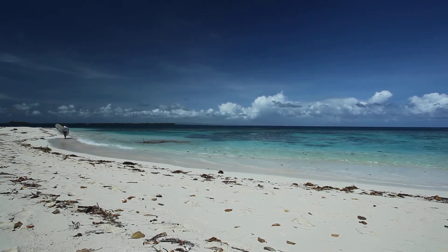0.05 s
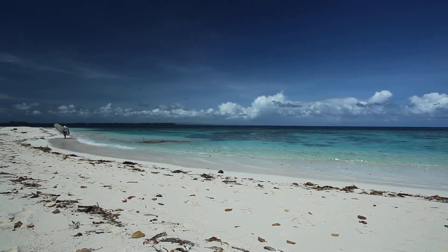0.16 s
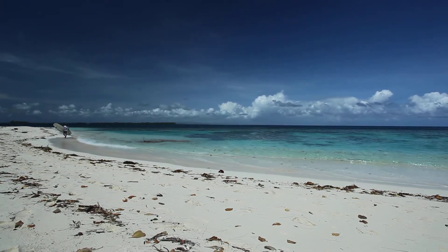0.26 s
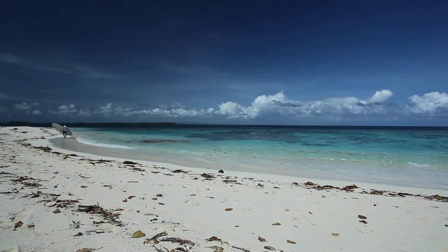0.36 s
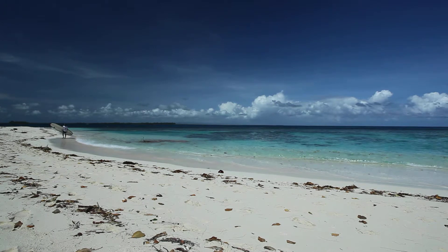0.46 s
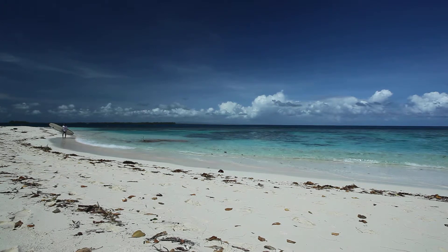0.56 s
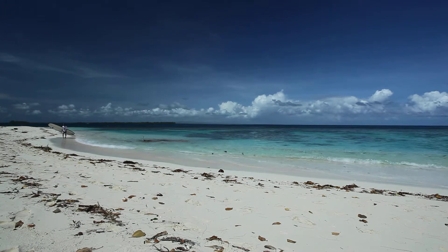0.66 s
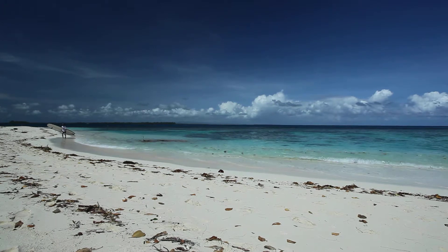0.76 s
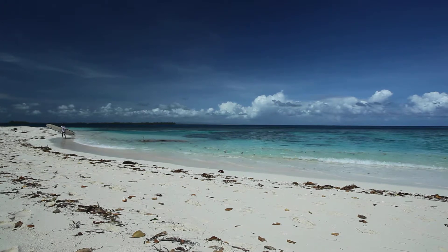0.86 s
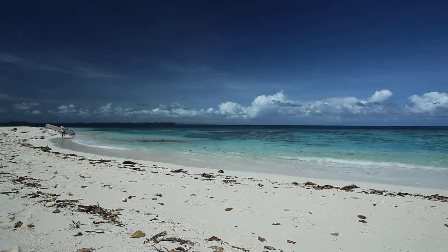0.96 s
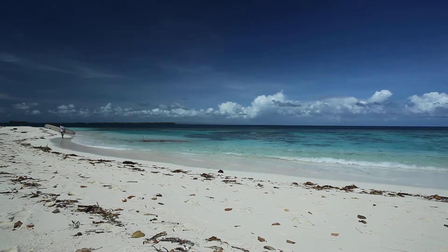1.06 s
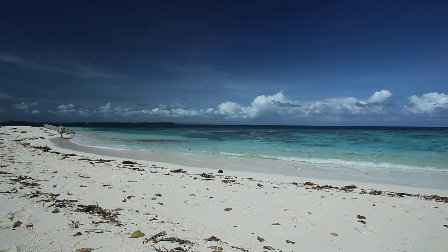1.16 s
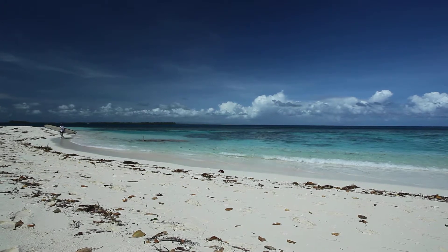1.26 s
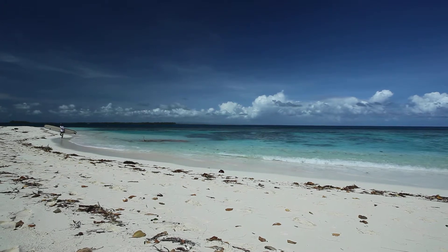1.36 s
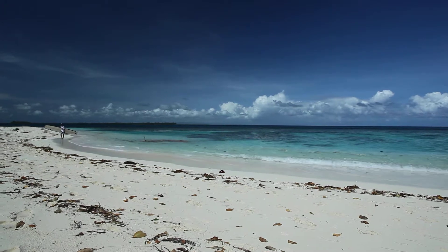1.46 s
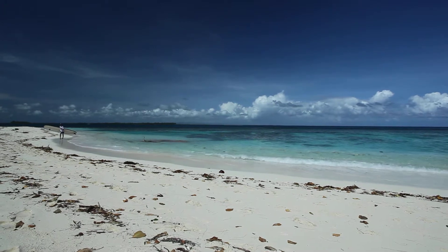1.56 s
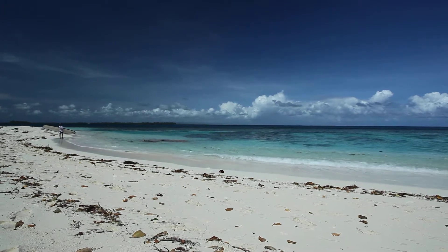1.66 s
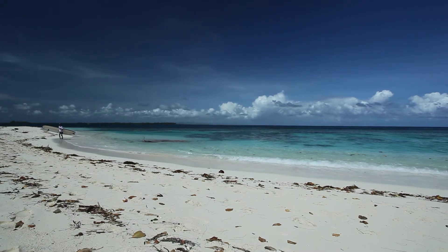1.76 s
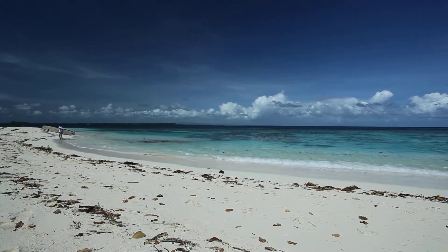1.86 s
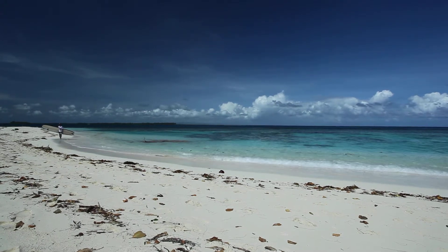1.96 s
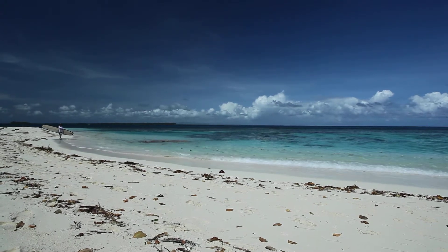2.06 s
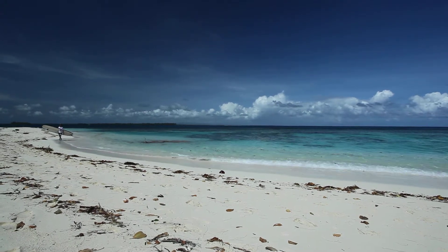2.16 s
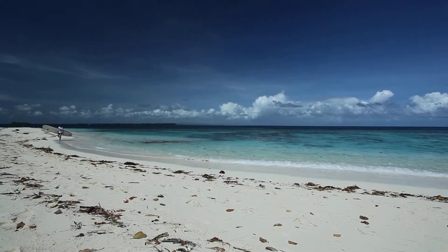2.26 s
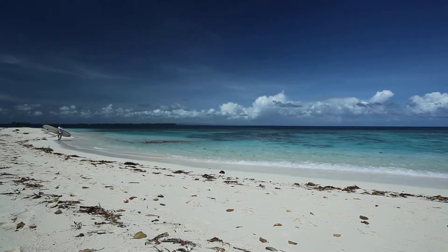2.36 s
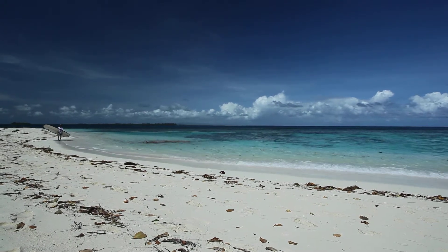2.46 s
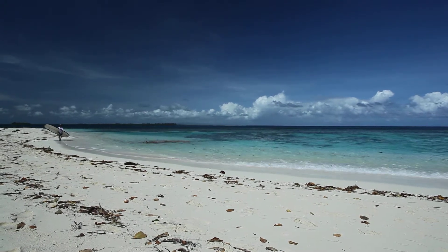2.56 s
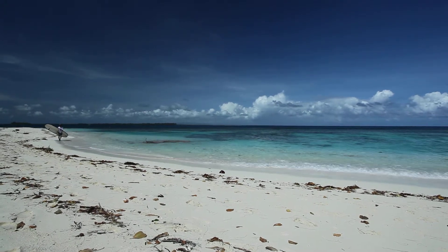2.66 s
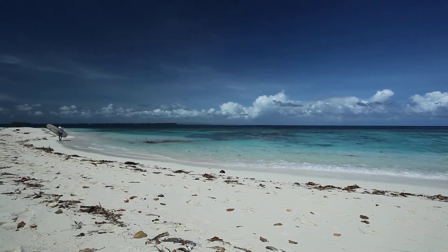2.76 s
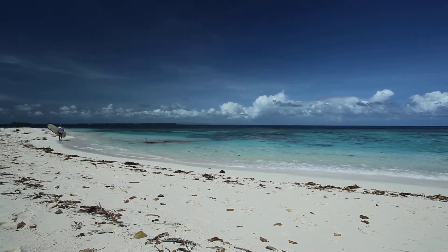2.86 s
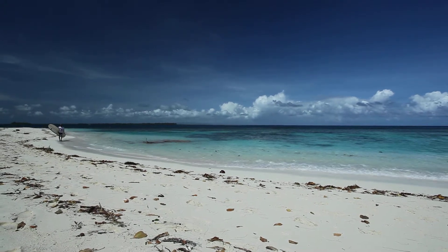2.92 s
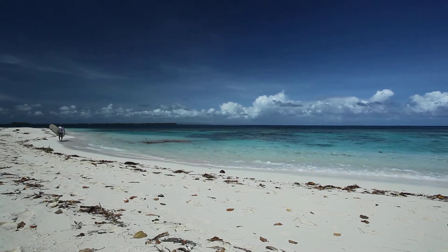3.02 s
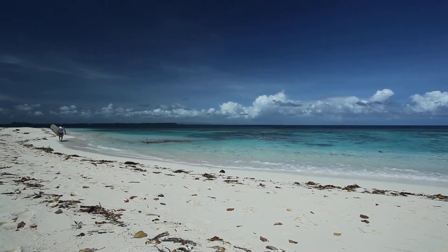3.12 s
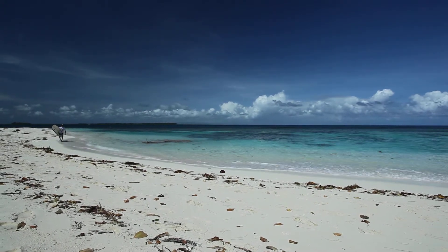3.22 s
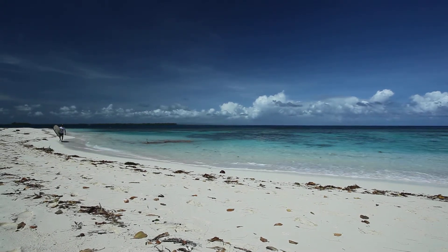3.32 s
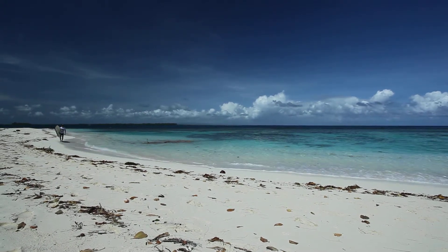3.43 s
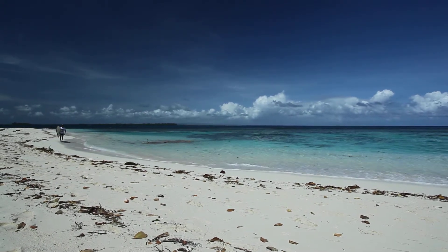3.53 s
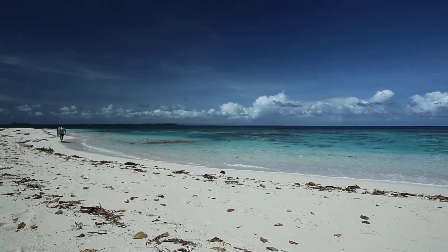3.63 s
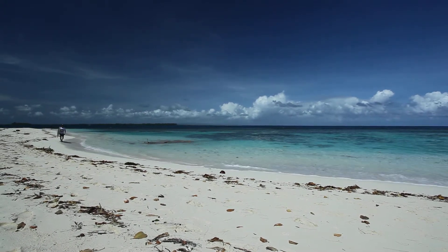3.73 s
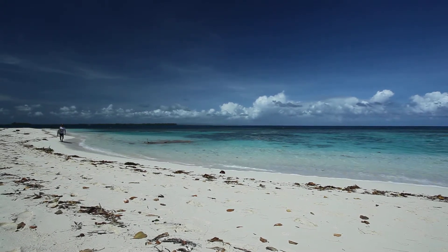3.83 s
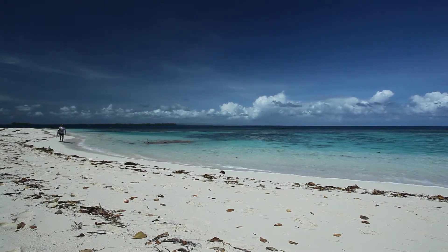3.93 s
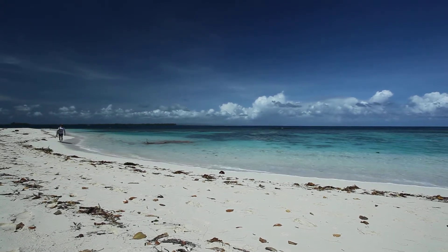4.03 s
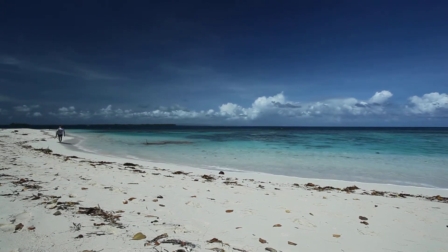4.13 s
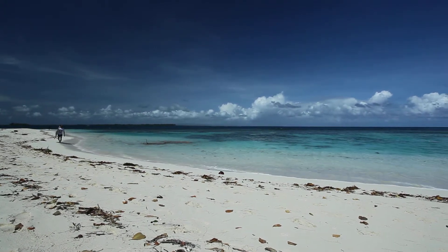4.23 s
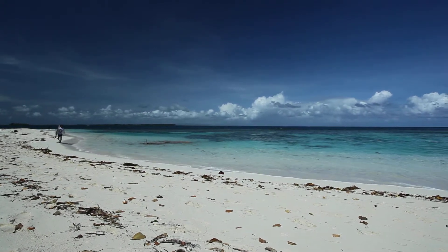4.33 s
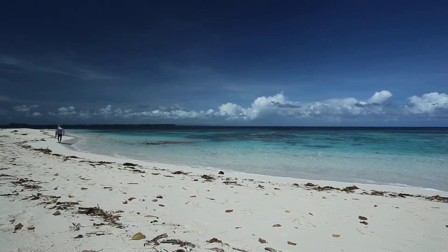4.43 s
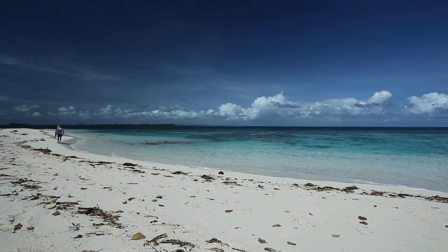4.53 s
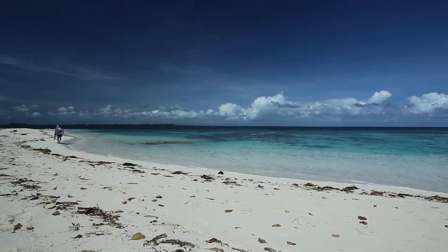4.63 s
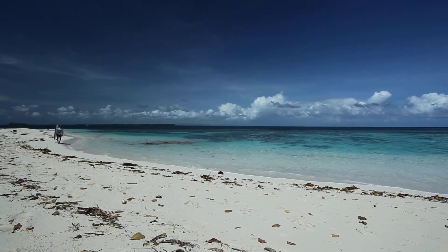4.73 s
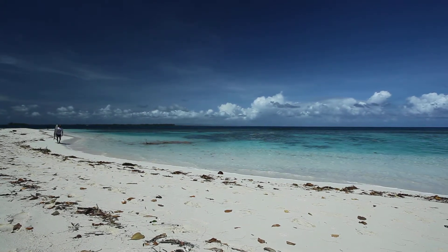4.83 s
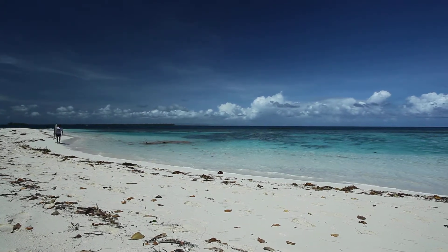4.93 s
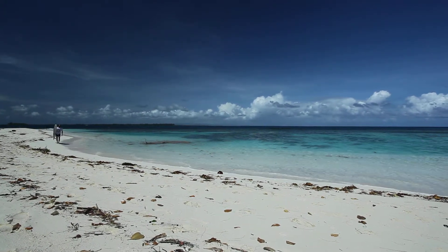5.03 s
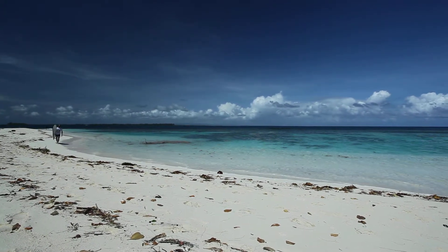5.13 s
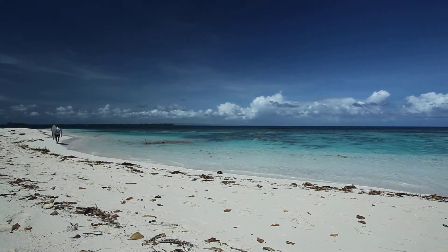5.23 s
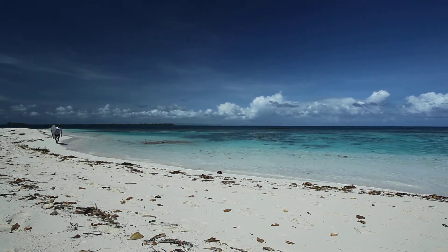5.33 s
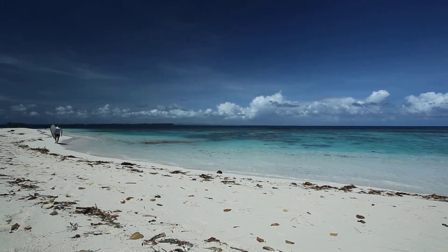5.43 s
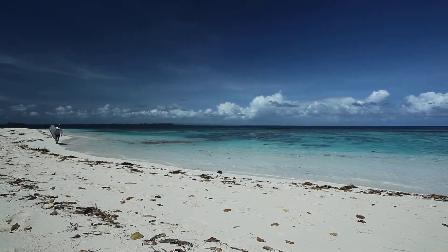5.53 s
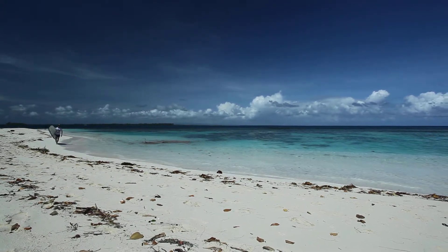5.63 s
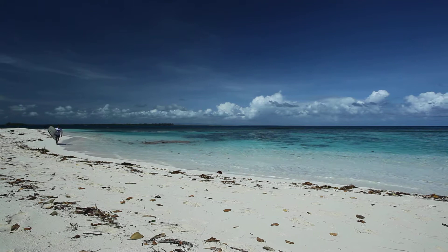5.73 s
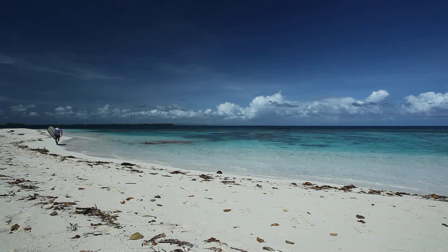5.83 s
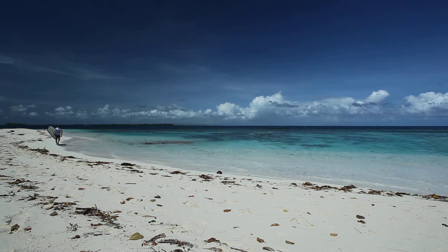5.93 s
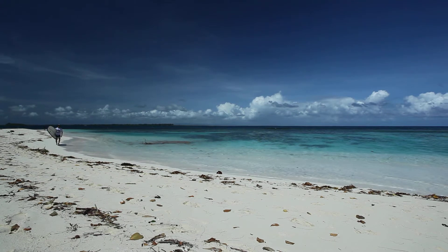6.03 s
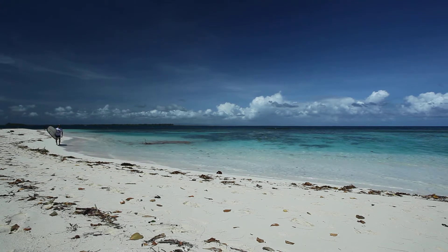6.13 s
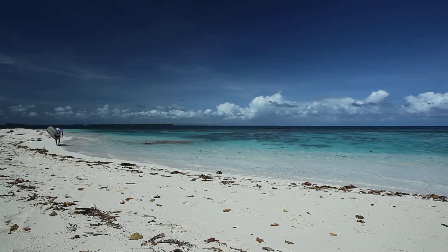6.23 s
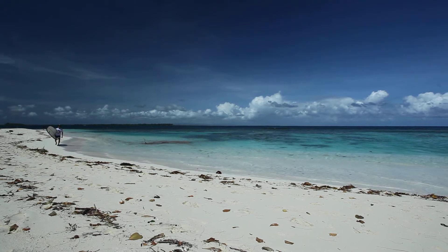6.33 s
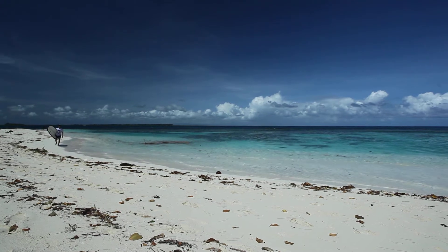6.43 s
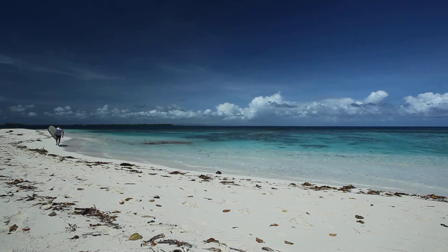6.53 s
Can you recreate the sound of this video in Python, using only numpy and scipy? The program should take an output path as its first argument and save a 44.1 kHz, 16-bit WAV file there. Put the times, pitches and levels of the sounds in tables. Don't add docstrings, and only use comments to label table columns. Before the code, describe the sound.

On an open sandy shore a small wave breaks immediately, with low bubbly gurgle and bright foamy hiss swelling to its fullest between one and two seconds. Small splashes and crisp bubble pops sit close. By three seconds it has drained to a soft fizz with faint laps. Wind rumbles and thumps the single microphone throughout; the sound is effectively mono and dry.

```python
import sys
import numpy as np
from scipy import signal
from scipy.fft import rfft, irfft
from scipy.io import wavfile
from scipy.ndimage import map_coordinates

SR = 44100
rng = np.random.default_rng(int(sys.argv[2]) if len(sys.argv) > 2 else 0)


def file_out(sig):
    cols = np.atleast_2d(sig).T
    lim = np.clip(cols, -1, 1)
    pcm = np.round(lim * 32767).astype(np.int16)
    wavfile.write(sys.argv[1], SR, pcm)


def boost(x):
    u = np.asarray(x, float) / 20
    return 10 ** u


N = 290178
HZ = np.fft.rfftfreq(N, 1 / SR) + 1e-3

# (time [s], breaker level [dB], foam level [dB])
BREAKER = [(0.0, -30.5, -34), (0.07, -29, -31), (0.42, -28.5, -31), (0.81, -25.5, -27.5),
           (1.3, -24.5, -24.5), (1.61, -24.5, -25.5), (2.05, -25, -24.5), (2.33, -28.5, -25.5),
           (2.73, -32, -33), (3.15, -37.5, -39.5), (3.43, -34, -39), (3.85, -36, -36.5), (4.16, -39.5, -39),
           (4.42, -44, -39.5), (5.07, -43, -42), (5.26, -45, -42.5), (5.68, -41, -44), (6.58, -43, -47)]
# (crest time [s], level [dB], rise [s], hold [s])
SWASH = [
    (0.244, -24.5, 0.54, 0.11),
    (1.65, -24.5, 1, 0.68),
    (2.95, -36, 0.24, .1),
    (3.595, -36.5, 0.51, 0.21),
    (5.054, -46, 0.081, 0.14),
    (5.55, -47.5, 0.17, 0.089),
]
# (crest time [s], level [dB], rise [s], hold [s])
FIZZ = [
    (1.35, -32, 0.42, 0.26),
    (2.3, -42, .3, .2),
    (4.2, -47, 0.45, .85),
]
BUBBLE_HZ = [520, 1350, 2600, 4500, 6400, 8400, 11500]
# (breaker [dB], swash [dB], foam [dB], fizz [dB], far surf [dB])
BUBBLE_MIX = [(-7.5, -31, -25, -30, -1.5), (1, -15, -25, -30, -11.5), (1, -4.5, -24, -30, -10),
              (-4, -1.5, -6, -25, -1.5), (-15, -6.5, -5, -20, -3), (-25, -21, 7, -4, -12),
              (-29, -28, -14, -5, -4.5)]
# (frequency [Hz], level per Hz [dB])
WATER_TONE = [(150, -20), (250, -5.5), (490, -3), (742, -2.5), (1160, -2.5), (1560, -1.23), (2960, -0.72),
              (4200, -3), (5410, -6), (7780, -2.5), (8900, -5), (10300, -13.5), (12500, -23), (15700, -34)]
# (time [s], extra path [mm], share of the direct sound [ratio])
SAND_ECHO = [(0.0, 48, 0.093), (0.45, 42, 0.079), (0.9, 42, 0.16), (1.2, 28, 0.073), (1.55, 22, 0.17),
             (1.9, 18, 0.054), (2.3, 25, .01), (6.58, 23, .01)]
# (time [s], peak level [dB], pitch [Hz], length [ms])
SPLASHES = [(0.111, -22.5, 2690, 22), (0.821, -21, 362, 36), (0.837, -21, 1714, 46), (1.152, -24, 1460, 56),
            (4.089, -35, 664, 30), (1.408, -28, 805, 14), (1.439, -24, 4460, 29), (1.635, -21, 1597, 40),
            (1.868, -25, 920, 37), (1.898, -23.5, 1580, 18), (2.474, -31, 1130, 30),
            (2.693, -28.5, 2260, 46), (3.249, -34.5, 1210, 19), (3.329, -31, 2920, 40),
            (3.482, -32, 805, 17), (3.563, -27, 2200, 15), (3.579, -34, 4110, 39), (3.915, -34.5, 873, 34),
            (4.018, -33, 2440, 20), (4.97, -40, 800, 12), (4.401, -34.5, 3130, 20), (3.859, -37, 3150, 14),
            (4.998, -39, 1320, 22), (5.497, -40, 2700, 26), (5.55, -41, 3030, 30), (5.628, -38, 1330, 25),
            (5.698, -44, 2920, 22), (5.745, -41, 4480, 22), (3.808, -37, 2580, 14),
            (6.392, -41.5, 2240, 17)]
# (time [s], peak level [dB], pitch [Hz])
POPS = [(0.0925, -15, 14500), (0.105, -21.5, 11300), (1.004, -20, 10300), (1.0557, -14, 8400),
        (2.0673, -9, 9700), (2.1722, -20.5, 9800), (2.2588, -13.5, 6300), (2.3777, -15, 8900),
        (3.2153, -28, 6300), (3.5233, -18, 7700), (3.568, -17, 8460), (3.8819, -24.5, 6400),
        (4.1997, -30.5, 11700), (4.4001, -28, 7600), (5.7425, -27.5, 4500), (5.9654, -31, 5100),
        (6.0734, -25.5, 5840), (6.2093, -37.5, 11400), (6.3331, -31, 4800)]
# (time [s], gust level [dB], extra buffeting of the largest eddies [dB])
WIND = [(0.0, -41, -4), (1.3, -45, -1), (1.36, -46.5, -18), (2.66, -46, -7), (3.02, -51, -13),
        (3.11, -49, 1), (3.33, -41, -6), (4.07, -48, -10), (4.25, -44, -8), (4.89, -50.5, -9),
        (4.97, -48, 7), (5.15, -49.5, -6), (5.55, -47, -1), (5.64, -49.5, -18), (5.77, -49, 1),
        (5.97, -48, -15), (6.3, -49.5, -1), (6.58, -48, -12)]
# (frequency [Hz], level per Hz [dB])
RUMBLE_TONE = [(14, -25), (22, -23), (40, -4), (70, -3), (130, -2.5), (220, -4.5), (300, -6.5), (420, -13),
               (600, -50)]
EDDY_HZ = [35, 90, 208]
EDDY_FOLLOWS = [
    (.95, .8, .02),
    (0.99, 0.12, 0.092),
    (0.12, .02, 0.28),
]
# (time [s], peak level [dB], pitch [Hz],
# length [ms])
THUMPS = [(0.138, -21, 121, 9.1), (0.361, -28, 152, 23), (0.502, -15.5, 143, 17), (0.551, -27.5, 84, 25),
          (1.072, -20, 113, 21), (1.131, -25.5, 140, 11), (1.205, -30, 106, 20), (1.607, -35, 206, 91),
          (2.335, -26, 130, 11), (2.506, -25, 118, 13), (2.568, -25.5, 162, 23), (2.646, -27, 87.5, 40),
          (3.135, -18.5, 130, 13), (3.164, -21, 114, 24), (3.188, -32, 131, 27), (3.266, -25, 113, 14),
          (3.302, -25, 96, 25), (3.33, -22.5, 109, 36), (3.355, -30, 140, 17), (3.484, -20, 99, 24),
          (3.529, -19.5, 136, 8.8), (3.853, -27, 99, 23), (4.275, -29.5, 86, 23), (4.489, -32, 89, 34),
          (4.964, -28, 81, 8.7), (5.111, -20, 153, 13), (5.457, -43, 134, 17), (5.5, -29, 137, 15),
          (5.891, -29.5, 177, 10), (0.851, -30.5, 170, 60)]
# (time [s], lowest pitch [Hz], highest pitch [Hz], level [dB])
WISPS = [(0.163, 13700, 15000, -66), (0.652, 12300, 13800, -60), (1.254, 4530, 6200, -28),
         (1.254, 8900, 10400, -35), (1.254, 11700, 13200, -50), (1.254, 13800, 15100, -52),
         (1.534, 5470, 7600, -33), (3.254, 11600, 13900, -61), (3.718, 8800, 11200, -49),
         (3.718, 11600, 13800, -54), (4.181, 7500, 9100, -50.5), (6.435, 5600, 7000, -58),
         (6.435, 10200, 11800, -61)]


def water(hiss_db, surge_db, patch_db, flutter_db):
    grains = bursts(5000.0, spread_db=2.5)
    hiss = boost(hiss_db) * rng.standard_normal(N)
    source = rfft(grains + hiss) * colour(WATER_TONE)
    levels = bubble_levels()
    surge = surge_db * drift(14.0)

    def patches():
        return patch_db * drift(14.0) + flutter_db * drift(46.0)

    return boost(-23.5) * crowd(source, levels, BUBBLE_HZ, 159.8, count=21, shared_db=surge, own_db=patches)


def bursts(per_s, spread_db):
    strength = boost(spread_db * np.minimum(rng.exponential(1, N), 4.5)) * rng.standard_normal(N)
    born = rng.random(N) < per_s / SR
    return rms_one(strength * born)


def bubble_levels():
    breaker, foam = boost(2 * in_time(BREAKER))
    swash = swell(SWASH, rise_db=5, drain_db_per_s=13.5)
    fizz = swell(FIZZ, rise_db=5, drain_db_per_s=12)
    far_surf = np.full(N, boost(2 * -48))
    powers = [breaker, swash, foam, fizz, far_surf]
    return 10 * np.log10(boost(2 * np.array(BUBBLE_MIX)) @ powers)


def swell(events, rise_db, drain_db_per_s):
    t = np.arange(N) / SR
    power = 0
    for s, db, rise, hold in events:
        before = rise_db * np.maximum(s - t, 0) / rise
        after = drain_db_per_s * np.maximum(t - s - hold, 0)
        power = power + boost(2 * (db - before - after))
    return power


def sand_echo(sea):
    mm, share = in_time(SAND_ECHO)
    delay = mm / 343000 * SR
    late = map_coordinates(sea, [np.arange(N) - delay], order=3, mode="mirror")
    return (sea + share * late) / np.sqrt(1 + share ** 2)


def splashes(spread, width, climb):
    out, t = np.zeros(N + 4000), np.arange(-1200, 1200) / SR
    chances = rng.standard_normal((len(SPLASHES), 2, 6, 1))
    for (s, db, hz, ms), (detune, late) in zip(SPLASHES, chances):
        age = (t - 0.31 * late * ms / 1000) / (width * ms / 1000)
        turns = hz * (1 + spread * detune) * t * (1 + climb * age) + late
        bubbles = np.exp(-age ** 2) * np.sin(2 * np.pi * turns)
        at = round(s * SR) - len(t) // 2
        out[at:at + len(t)] += boost(db - 5.5) * np.sum(bubbles, axis=0)
    return out[:N]


def pops(cycles, boost_db):
    out, t = np.zeros(N + 400), np.arange(400) / SR
    for s, db, hz in POPS:
        age = t * hz / cycles
        ring = age * np.exp(1 - age) * np.sin(2 * np.pi * hz * t)
        at = round((s - cycles / hz) * SR)
        out[at:at + len(t)] += boost(db + boost_db) * ring
    return out[:N]


def thumps(rise, fall, skew, push_db):
    out, t = np.zeros(N), np.arange(-2600, 2600) / SR
    for (s, db, hz, ms), start in zip(THUMPS, rng.random(len(THUMPS))):
        angle = 2 * np.pi * (start + hz * t)
        length = np.where(t < 0, rise, fall) * ms / 1000
        loudness = np.exp(-(t / length) ** 2)
        shove = boost(push_db) * np.sin(angle / 2)
        swing = np.sin(angle + skew * np.sin(angle)) + shove
        at = round(s * SR) - len(t) // 2
        out[at:at + len(t)] += boost(db) * loudness * swing
    return out


def wind(lumps_db, own_lumps_db):
    source = rfft(rng.standard_normal(N)) * colour(RUMBLE_TONE)
    breaker_db = in_time(BREAKER)[0]
    levels = np.array(EDDY_FOLLOWS) @ [*in_time(WIND), breaker_db]
    lumps = lumps_db * drift(25.0)

    def own_lumps():
        return own_lumps_db * drift(15.0)

    return boost(-37) * crowd(source, levels, EDDY_HZ, 15.9, count=16, shared_db=lumps, own_db=own_lumps)


def wisps():
    half, offset = 1024, 71
    out = np.zeros(N)
    window = signal.windows.kaiser_bessel_derived(2 * half, 4 * np.pi)
    for s, low_hz, high_hz, db in WISPS:
        lines = np.arange(round(low_hz * 2 * half / SR), round(high_hz * 2 * half / SR)) + 0.5
        waves = np.cos(np.pi / half * np.outer(np.arange(2 * half) + 0.5 + half / 2, lines))
        noise = waves @ rng.standard_normal(half)[:len(lines)]
        at = offset + half * (round((s * SR - offset) / half) - 1)
        out[at:at + 2 * half] += boost(db) * window * rms_one(noise)
    return out * [[1], [-1]]


def crowd(source, levels, class_hz, first_hz, count, shared_db, own_db):
    levels = levels - 10 * np.log10(np.mean(boost(2 * levels), axis=1, keepdims=True))
    out = 0
    for hz in first_hz * 2 ** (np.arange(count) / 3):
        band = np.cos(np.pi / 2 * np.clip(np.log2(HZ / hz) * 3, -1, 1))
        shares = [np.interp(np.log(hz), np.log(class_hz), row) for row in np.eye(len(class_hz))]
        gain = boost(shares @ levels + shared_db + own_db())
        out = out + gain * np.roll(irfft(source * band, N), rng.integers(N))
    return rms_one(out)


def drift(rate):
    r = np.exp(-40 * np.pi * rate / SR)
    slow = signal.lfilter([1], [1, -2 * r, r * r], rng.standard_normal(N // 20 + 2002))[2000:]
    return np.interp(np.arange(N) / 20, np.arange(len(slow)), rms_one(slow - slow.mean()))


def colour(points):
    hz, db = np.transpose(points)
    return boost(np.interp(np.log(HZ), np.log(hz), db, left=-120))


def in_time(rows):
    s, *columns = np.transpose(rows)
    return np.array([np.interp(np.arange(N) / SR, s, c) for c in columns])


def rms_one(x):
    return x / np.sqrt(np.mean(x ** 2) + 1e-20)


def scene():
    sea = water(hiss_db=-1.0, surge_db=0.38, patch_db=0.16, flutter_db=0.4)
    near = pops(cycles=1.3, boost_db=1.0) + splashes(spread=0.0507, width=0.23, climb=0.017)
    near = signal.sosfilt(signal.butter(3, 9300, fs=SR, output="sos"), near)
    air = wind(lumps_db=1.3, own_lumps_db=1.0) + thumps(rise=0.29, fall=0.53, skew=0.49, push_db=-8.0)
    return np.tile(sand_echo(sea) + near + air, (2, 1))


def band_limit(x):
    return signal.sosfilt(signal.butter(12, 15720, fs=SR, output="sos"), x)


def record(dry):
    rounded = 1.1 * np.tanh(dry / 1.1)
    return band_limit(rounded + wisps())


dry = scene()
out = record(dry)
file_out(out)
```